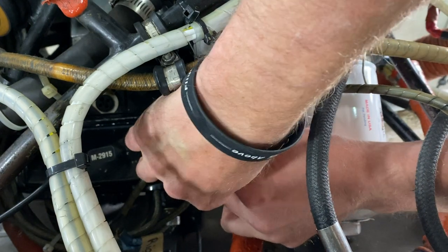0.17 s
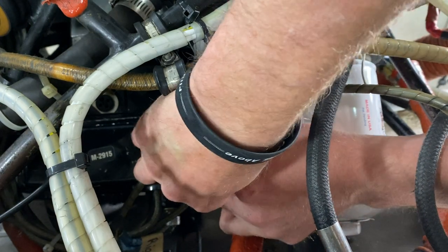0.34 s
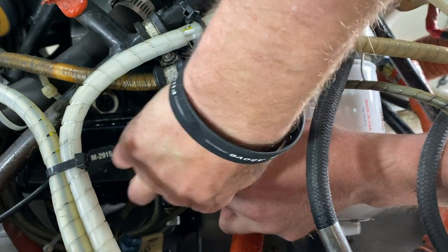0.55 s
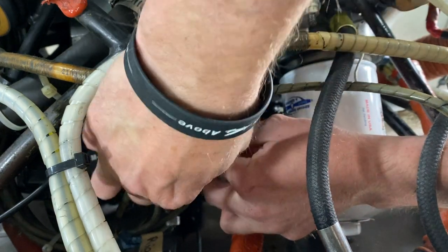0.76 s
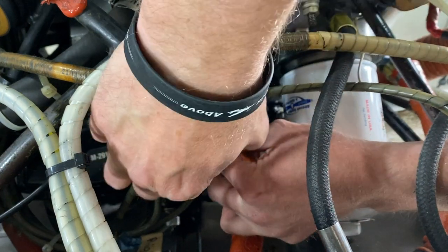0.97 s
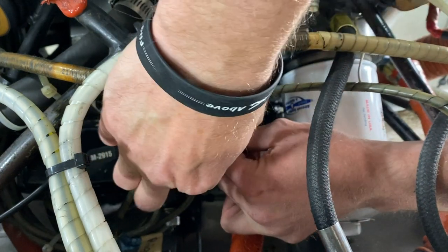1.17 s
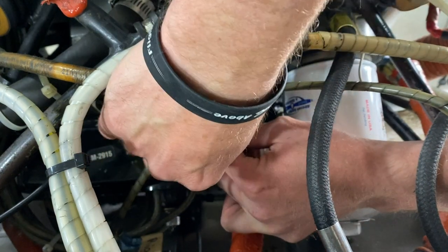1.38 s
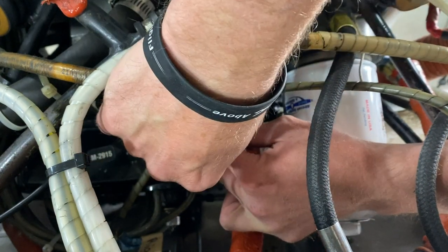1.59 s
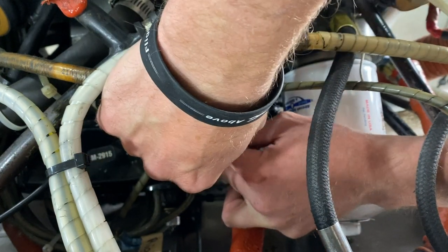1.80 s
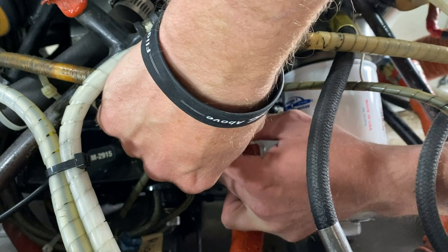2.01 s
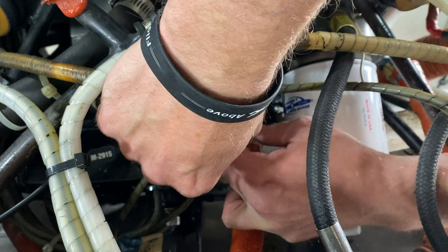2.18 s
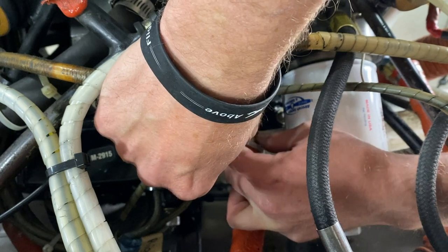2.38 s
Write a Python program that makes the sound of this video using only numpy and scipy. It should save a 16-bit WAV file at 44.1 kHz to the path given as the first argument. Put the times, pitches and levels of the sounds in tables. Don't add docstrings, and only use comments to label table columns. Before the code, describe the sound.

After faint finger ticks, a plastic tie zips through its teeth, quick, slightly slower, then quick again; afterwards come small clicks, dull knocks and scuffs, close up, with a low hush and faint wash of a large hall.

```python
import sys
import numpy as np
from scipy import signal
from scipy.fft import rfft, irfft
from scipy.io import wavfile

SR = 44100
rng = np.random.default_rng(int(sys.argv[2]) if len(sys.argv) > 2 else 0)


def pcm_store(signal):
    levels = np.round(np.clip(np.atleast_2d(signal), -1, 1) * 32767)
    wavfile.write(sys.argv[1], SR, levels.astype(np.int16).T)


def elevation(decibels):
    levels = np.asarray(decibels, float)
    return 10 ** (levels / 20)


N = 108045
TIME_S = np.arange(N) / SR


def rms_one(x):
    return x / np.sqrt(np.mean(x ** 2) + 1e-20)


def coloured(x, spectrum):
    hz = np.arange(x.shape[-1] // 2 + 1) * SR / x.shape[-1] + 1
    point_hz, point_db = np.transpose(spectrum)
    level_db = np.interp(np.log(hz), np.log(point_hz), point_db)
    edge = np.minimum(1, hz / point_hz[0]) ** 2
    return irfft(rfft(x) * elevation(level_db) * edge, x.shape[-1])


def over_time(table):
    return np.interp(TIME_S, *np.transpose(table))


def drift(rate_hz):
    knots = rng.standard_normal(200)
    return np.interp(TIME_S * rate_hz, np.arange(200), knots)


def highpass(x, order, cut_hz):
    return signal.sosfilt(signal.butter(order, cut_hz, "high", fs=SR, output="sos"), x)


def clicks(start_s, gain):
    out = np.zeros(N)
    at = np.clip((np.asarray(start_s) * SR).astype(int), 0, N - 1)
    np.add.at(out, at, gain)
    return out


def ring(x, pitch_hz, t60_s):
    r, w = elevation(-60 / (t60_s * SR)), 2 * np.pi * pitch_hz / SR
    return signal.lfilter([0, np.sin(w)], [1, -2 * r * np.cos(w), r * r], x + 1e-18)


def double_ring(length, pitch_hz, rise_t60_s, t60_s):
    unit = ring(ring(np.arange(length) == 0, pitch_hz, rise_t60_s), pitch_hz, t60_s)
    return unit / abs(unit).max()


# pitch_hz [Hz], level_db [dB]
HALL_COLOUR = [(20, 10.5), (70, -3.5), (183, -11), (350, -17.5), (630, -18), (900, -25), (3000, -39.5),
               (16200, -39)]
# start_s [s], level_db [dB]
SWAY = [(0, -6.5), (.15, 1), (.3, 1.5), (.5, 1.5), (.76, 11.5), (0.901, 4.5), (1.2, -0.7), (1.6, -2.5),
        (1.82, -5), (1.889, 13), (2.029, 0.5), (2.45, -1.5)]


def hall():
    hush = rms_one(coloured(rng.standard_normal(N), HALL_COLOUR))
    rumble = signal.sosfiltfilt(signal.butter(2, 114, fs=SR, output="sos"), hush)
    swing_db = 4 * drift(3)
    rumble_gain = elevation(over_time(SWAY) + swing_db)
    return elevation(-57.5) * (hush + rumble * (rumble_gain - 1))


def echo(x):
    level_db, t60_s, rise_s = -25.5, .36, .009
    t = np.arange(SR // 2) / SR
    wash = rng.standard_normal(len(t)) * elevation(-60 * t / t60_s) * np.minimum(1, t / rise_s)
    return elevation(level_db) * signal.fftconvolve(x, wash / np.linalg.norm(wash))[:N]


# start_s [s], level_db [dB]
RUB = [(0, -65), (.22, -60), (.8, -65.5), (0.921, -63.5), (0.979, -69), (1.06, -63.5), (1.299, -66),
       (1.53, -67), (1.59, -73), (1.72, -73), (1.8, -77), (1.88, -75), (2.15, -74), (2.27, -69.5),
       (2.45, -69.5)]
# pitch_hz [Hz], level_db [dB]
RUB_COLOUR = [(150, -1.5), (450, -10.5), (650, -6), (900, -22), (1460, -6.5), (2200, -10.5), (3100, -8.5),
              (12000, -33)]


def rub():
    grains_per_s, grain_db, swing_db = 2700, 2.5, 2.5
    sizes = elevation(grain_db * np.minimum(rng.exponential(1, N), 5))
    sizes = sizes * rng.choice([-1, 1], N)
    present = rng.random(N) < grains_per_s / SR
    grains = rms_one(coloured(sizes * present, RUB_COLOUR))
    return elevation(over_time(RUB) + swing_db * drift(30)) * grains


# start_s [s], length_s [s], level_db [dB]
SCUFFS = [
    (0.131, 0.01, -54),
    (1.861, 0.033, -58),
    (1.884, 0.027, -62.5),
    (2.244, 0.0142, -59.5),
]
# pitch_hz [Hz], level_db [dB]
SCUFF_COLOUR = [(500, 4.5), (1200, -10), (4000, -18), (15000, -26.5)]


def scuffs():
    grain = rms_one(coloured(rng.laplace(size=N), SCUFF_COLOUR))
    envelope = np.zeros(N)
    for start_s, length_s, level_db in SCUFFS:
        fade = np.exp(-np.abs((TIME_S - start_s) / length_s) ** 3)
        envelope += elevation(level_db) * (TIME_S > start_s) * fade
    return grain * envelope


# start_s [s], peak_db [dB], pitch_hz [Hz], t60_s [s]
BUMPS = [(0.127, -49, 202, 0.1), (.149, -40, 228, 0.027), (0.512, -30, 168, 0.12), (0.51, -41, 1522, 0.074),
         (0.513, -43, 1090, 0.058), (0.606, -37, 208, 0.046), (.755, -45.5, 387, 0.029),
         (1.138, -47.5, 654, 0.071), (1.14, -51, 185, 0.064), (1.169, -49, 684, 0.02),
         (1.249, -56.5, 195, 0.12), (1.286, -63, 670, 0.029), (1.309, -58.5, 641, 0.089),
         (1.336, -41.5, 175, 0.025), (1.338, -59, 637, .05), (1.443, -53, 340, 0.034),
         (1.443, -56.5, 640, 0.2), (1.49, -57, 680, 0.083), (1.607, -57.5, 280, 0.053),
         (1.611, -50.5, 630, .08), (1.838, -38.5, 460, 0.034), (1.839, -42, 188.6, 0.064),
         (1.841, -49, 640, 0.047), (1.886, -43.5, 203, 0.022), (1.889, -42.5, 402, 0.053),
         (1.887, -45.5, 640, 0.054), (1.889, -60, 1153, 0.086), (1.865, -63.5, 1990, 0.078),
         (1.919, -51, 640, 0.035), (2.225, -58.5, 184, 0.065), (2.248, -52.5, 628, 0.096),
         (2.348, -50, 175, 0.068)]
# pitch_hz [Hz], level_db [dB], t60_s [s]
HOSES = [(177, -7, 0.14), (197, 2.5, 0.072), (214.2, -12, 0.44), (294, 3.2, 0.065), (415.4, -6.5, 0.042),
         (547.3, -5, 0.12), (640, -3.5, 0.071), (729, -8.5, 0.093), (740, -20.5, 0.058)]


def bumps():
    peak_trim_db, rise_cycles = -1, 4
    slide_db, slide_t60_s, reach_octaves = -7.5, .035, .4
    thuds, slides = np.zeros(N + 8192), np.zeros(N)
    for start_s, peak_db, pitch_hz, t60_s in BUMPS:
        thud = double_ring(8192, pitch_hz, rise_cycles / pitch_hz, t60_s)
        thuds[int(start_s * SR):][:8192] += elevation(peak_db + peak_trim_db) * thud
    start_s, peak_db, bump_hz, _ = np.transpose(BUMPS)
    fade, grain = elevation(-60 / (slide_t60_s * SR)), rng.standard_normal(N)
    for pitch_hz, level_db, t60_s in HOSES:
        reach = np.exp(-(np.log2(pitch_hz / bump_hz) / reach_octaves) ** 2)
        hits = clicks(start_s, elevation(peak_db + level_db + slide_db) * reach)
        envelope = signal.lfilter([np.sqrt(1 - fade ** 2)], [1, -fade], hits + 1e-18)
        slides += ring(envelope * grain, pitch_hz, t60_s)
    return thuds[:N] + signal.lfilter([.15], [1, -.85], slides)


# start_s [s], peak_db [dB], bright_db [dB per octave], body_hz [Hz]
TICKS = [(0.0348, -49, 0.1, 5030), (0.0384, -47, 5, 5000), (0.069, -47, 6, 9140), (0.1547, -41, -2, 2980),
         (0.1991, -38.5, -5.5, 2980), (0.9981, -48.5, -2.5, 3500), (1.0234, -48, 4, 5060),
         (1.0433, -50.5, -3, 3006), (1.0867, -50, -7, 3000), (1.2233, -30, -5, 5230),
         (1.2338, -53, 5, 5000), (1.2712, -53, 4, 2800), (1.287, -35, -1, 3470), (1.3068, -40, -4, 3770),
         (1.309, -54, 2, 7740), (1.35, -38, -5.5, 2720), (1.5115, -55, -2, 6000), (1.5306, -49, 3, 3100),
         (1.3958, -46, -6, 3200), (1.5225, -28.5, 0.5, 3170), (1.5373, -46.5, -4, 5000),
         (1.726, -52, -1.5, 3800), (2.0674, -34.5, -0.5, 4300), (2.22, -53.5, 2, 4100),
         (2.2686, -43, 7.5, 6090), (2.3446, -43, 6.5, 7000), (2.3705, -55, 17.5, 4000),
         (2.3935, -50.5, 1, 4970), (2.4032, -52, -3, 4000), (2.4434, -44, -4, 3230)]
# pitch_hz [Hz], level_db [dB], t60_s [s]
PLASTIC = [(1550, -9.5, .004), (3050, -1.5, .0035), (5250, -6, 0.002), (8315, -4.5, 0.0023),
           (10200, -13, 0.00061), (13000, -15.5, .001)]


def ticks():
    lag_s, noise_gain = .0008, .3
    burst_t60_s, tail_db, tail_t60_s = .0015, -26, .025
    body_db, body_t60_s = -1.5, .002
    out, t = np.zeros(N + 2048), np.arange(2048) / SR
    envelope = elevation(-60 * t / burst_t60_s) + elevation(tail_db - 60 * t / tail_t60_s)
    for start_s, peak_db, bright_db, body_hz in TICKS:
        noise = rng.standard_normal(2048)
        hit = (t == 0) + noise_gain * noise * envelope
        tick = elevation(body_db) * ring(hit, body_hz, body_t60_s)
        for k, (pitch_hz, level_db, t60_s) in enumerate(PLASTIC):
            gain = elevation(level_db + bright_db * np.log2(pitch_hz / 4000)) * (-1) ** k
            tick += gain * ring(hit, pitch_hz * (1 + noise[-1 - k] / 20), t60_s)
        out[int((start_s + lag_s) * SR):][:2048] += elevation(peak_db) * tick / abs(tick).max()
    return highpass(out[:N], 2, 1300)


SHAKE_LAG_S = .002
# pitch_hz [Hz], level_db [dB], t60_s [s], loudest_s [s], width_s [s]
PASSING_RINGS = [(1060, -47, .04, 0.31, 0.07), (1595, -42.5, .032, 0.53, .08), (1990, -47, 0.049, 0.5, 0.12),
                 (724, -38.5, 0.055, .46, 0.069), (766, -47, 0.046, .26, .025), (680, -48, .04, 0.28, 0.013),
                 (620, -34, 0.09, 0.44, 0.021), (674, -43, .04, 0.526, 0.028),
                 (1934, -44.5, 0.056, 0.704, 0.062), (690, -49.5, .035, 0.56, 0.024),
                 (4400, -40, 0.0157, 0.41, .06), (5174, -41, 0.018, .45, 0.066),
                 (4940, -46.5, 0.043, 0.6, 0.037), (2800, -47.5, 0.019, 0.52, 0.34)]


def passing_rings(tooth_s):
    out = np.zeros(N)
    for pitch_hz, level_db, t60_s, loudest_s, width_s in PASSING_RINGS:
        swell = np.exp(-((tooth_s - loudest_s) / width_s) ** 2)
        uneven = 1 + .35 * rng.standard_normal(len(tooth_s))
        out += ring(clicks(tooth_s + SHAKE_LAG_S, elevation(level_db) * swell * uneven), pitch_hz, t60_s)
    return out


def hose_shake(tooth_s, low_db, high_db):
    low_top_hz, low_spread_db = 350, 1.2
    out = np.zeros(N)
    for pitch_hz, level_db, t60_s in HOSES:
        even, free = rng.standard_normal((2, len(tooth_s)))
        if pitch_hz < low_top_hz:
            strength = elevation(low_db + low_spread_db * even)
        else:
            strength = elevation(high_db) * (1 + free)
        out += ring(clicks(tooth_s + SHAKE_LAG_S, elevation(level_db) * strength), pitch_hz, t60_s)
    return out


RISE_S = .0006
# pitch_hz [Hz], t60_s [s], rise_ratio [times RISE_S]
RATTLE_BANDS = [(1200, .05, 4), (2500, .036, 2.5), (5000, .032, 1.4), (8500, .027, .4), (14000, .03, .5)]


def rattle_path(spectrum):
    hold_s, hold_end_db = .0046, -3.5
    t, out = np.arange(4096) / SR, np.zeros(4096)
    white = rfft(coloured(rng.standard_normal(4096), spectrum))
    hz = np.arange(2049) * SR / 4096 + 1
    centres = np.log(np.array(RATTLE_BANDS)[:, 0])
    for k, (_, t60_s, rise_ratio) in enumerate(RATTLE_BANDS):
        share = np.interp(np.log(hz), centres, np.arange(len(centres)) == k)
        rise = np.minimum(1, t / (RISE_S * rise_ratio)) ** 2
        out += irfft(white * share) * rise * elevation(-60 * t / t60_s)
    out *= elevation(np.where(t > hold_s, hold_end_db, 0))
    return out / np.sqrt(np.mean(out[:200] ** 2))


GRIP_S = [.25, .38, .5, .6, .72]
# pitch_hz [Hz], level_db [dB]
GRIPS = [
    [(900, -19), (2000, -15), (4600, -15), (7500, -9.5), (11000, -2.5), (14200, 7), (16000, -21)],
    [(900, -24), (2400, -25), (4600, -25.5), (8000, -8), (10500, -11.5), (13300, -3), (16000, -13.5)],
    [(900, -20), (2400, -28), (5000, -20), (8000, -9.5), (10500, -7.5), (13500, 2), (16000, 1.5)],
    [(900, -14), (2400, -20), (5000, -8), (7200, -3.5), (10500, -6), (13000, 3.5), (15800, 1.5)],
    [(900, -12), (2400, -16.5), (4000, -13.5), (7300, -11.5), (10000, -9.5), (12500, -2.5), (15800, -5)],
]


def rattle(tooth_s, rattle_db):
    spread_db, tooth_new = 1.1, .26
    out = np.zeros(N)
    gain = elevation(rattle_db + spread_db * rng.standard_normal(len(tooth_s)))
    chance = tooth_new * rng.standard_normal((2, len(GRIPS), len(tooth_s)))
    for k, colour in enumerate(GRIPS):
        share = gain * np.sqrt(np.interp(tooth_s, GRIP_S, np.arange(len(GRIPS)) == k))
        for strength in (1, chance[0, k], chance[1, k]):
            out += signal.fftconvolve(clicks(tooth_s, share * strength), rattle_path(colour))[:N]
    return out


def direct_snap(tooth_s, snap_db):
    snap_hz, t60_s = 14510, .0007
    unit = double_ring(200, snap_hz, t60_s, t60_s)
    return np.convolve(clicks(tooth_s + RISE_S / 2, elevation(snap_db)), unit)[:N]


# start_s [s], teeth_passed [count]
FIRST_PULL = [(.2372, 0), (.2418, 1), (.245, 2), (.2588, 7), (.2664, 9)]
LAST_PULL = [(.6143, 0), (.636, 3), (.6472, 5), (.6728, 10), (.6913, 14), (.7075, 17), (.7204, 19),
             (.7287, 20), (.7505, 22)]
SLOW_TEETH = [.273, .2857, .2952, .3026, .3114, .3261, .3395, .355, .3662, .382, .3962, .412, .4292, .4434,
              .4565, .468, .4804, .4911, .5007, .5109, .5209, .5312, .5403, .5517, .566, .579, .5929, .6061]


def tooth_times():
    quick = []
    for pull in (FIRST_PULL, LAST_PULL):
        start_s, teeth_passed = np.transpose(pull)
        quick.append(np.interp(np.arange(pull[-1][1] + 1), teeth_passed, start_s))
    quick = np.concatenate(quick)
    jitter_s = .00012 * rng.standard_normal(len(quick))
    return np.concatenate([quick + jitter_s, SLOW_TEETH])


# start_s [s], rattle_db [dB], low_shake_db [dB], high_shake_db [dB], snap_db [dB]
TENSION = [(0.241, -25, -45, -46, -13), (0.261, -29.5, -58.5, -51, -6.5), (0.276, -27, -42, -44.5, -28),
           (.34, -27, -45.5, -39, -27), (.42, -27.5, -48.5, -47, -26.5), (0.507, -22.5, -46, -52, -33),
           (0.568, -26.5, -61.5, -52, -59.5), (0.655, -29.5, -39, -52.5, -23.5),
           (.715, -31, -45.5, -47.5, -29), (.75, -29.5, -47, -55, -40)]


def strap():
    tooth_s = tooth_times()
    start_s, *levels = np.transpose(TENSION)
    rattle_db, low_db, high_db, snap_db = [np.interp(tooth_s, start_s, level) for level in levels]
    bright = direct_snap(tooth_s, snap_db) + rattle(tooth_s, rattle_db)
    return bright + hose_shake(tooth_s, low_db, high_db) + passing_rings(tooth_s)


def scene():
    near = highpass(strap() + ticks() + bumps() + scuffs(), 4, 155)
    return (near + echo(near) + rub() + hall())[None]


def roll_off(x):
    return signal.sosfilt(signal.butter(12, 16970, fs=SR, output="sos"), x)


def record(dry):
    mix = signal.sosfilt(signal.ellip(8, 1, 28, 15950, fs=SR, output="sos"), dry)
    return roll_off(mix)


dry = scene()
out = record(dry)
pcm_store(out)
```